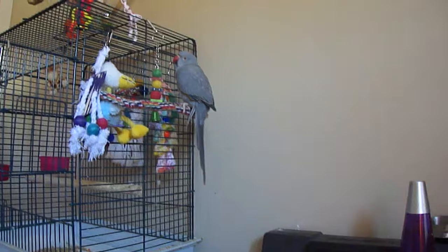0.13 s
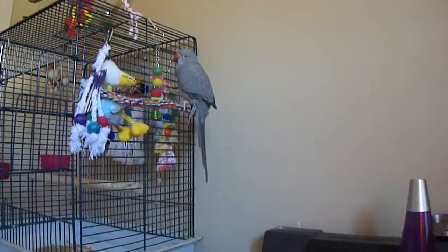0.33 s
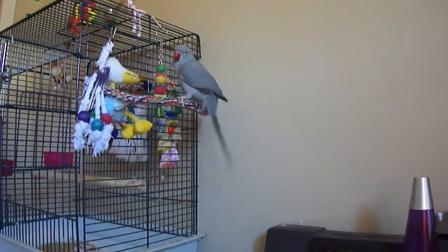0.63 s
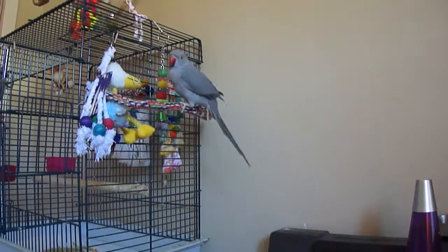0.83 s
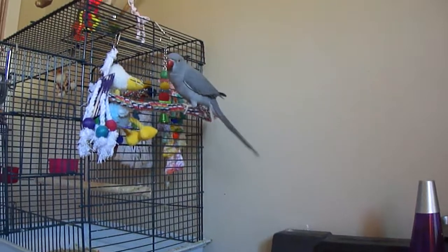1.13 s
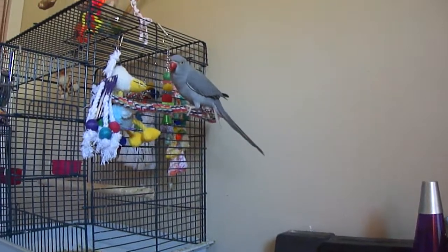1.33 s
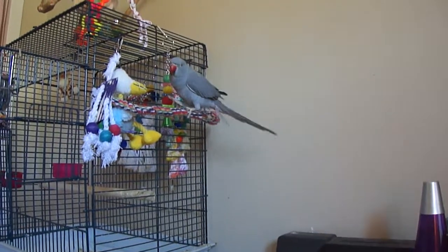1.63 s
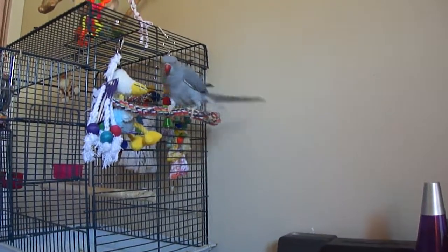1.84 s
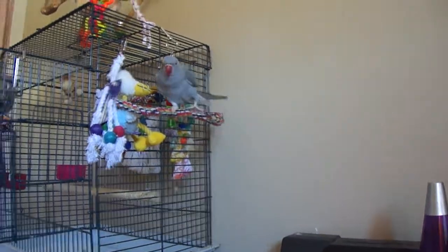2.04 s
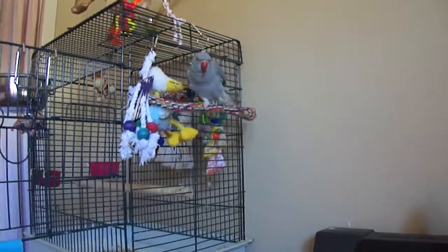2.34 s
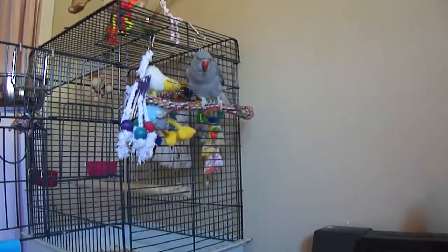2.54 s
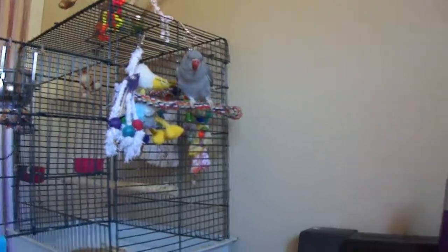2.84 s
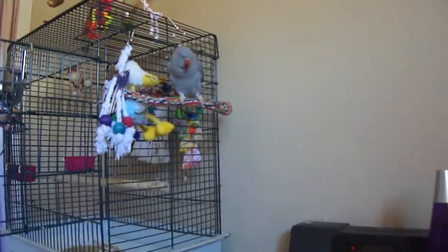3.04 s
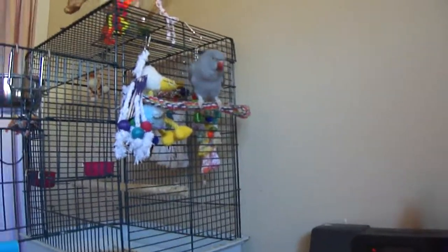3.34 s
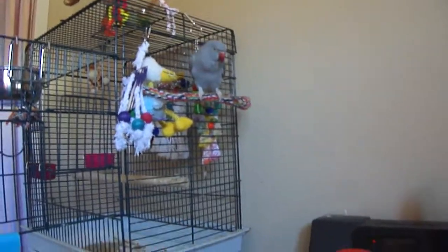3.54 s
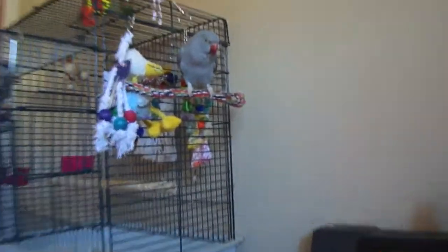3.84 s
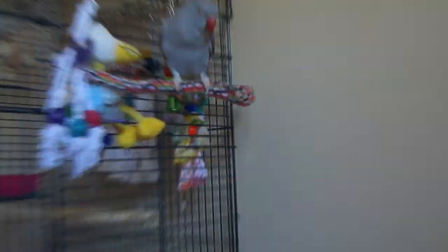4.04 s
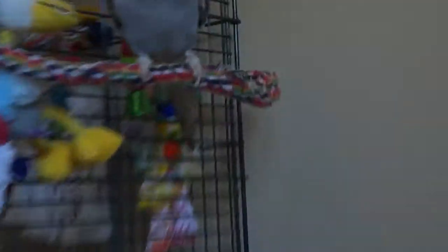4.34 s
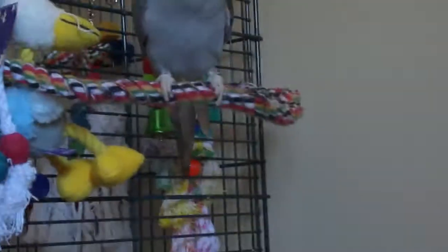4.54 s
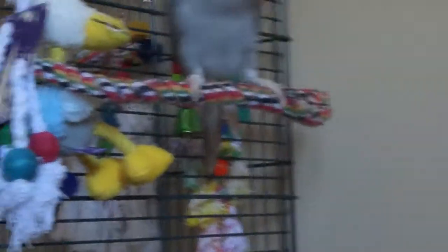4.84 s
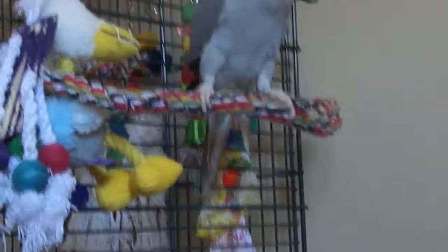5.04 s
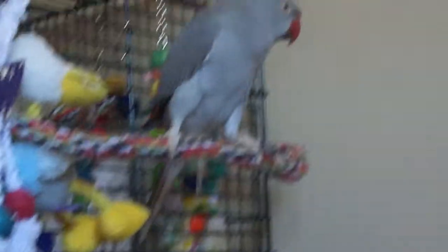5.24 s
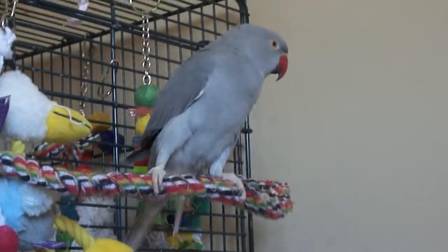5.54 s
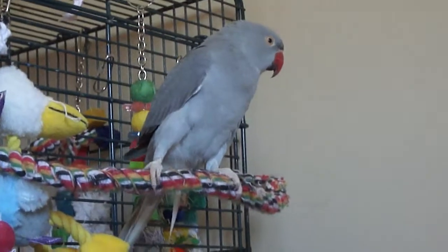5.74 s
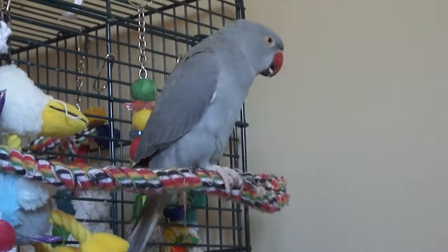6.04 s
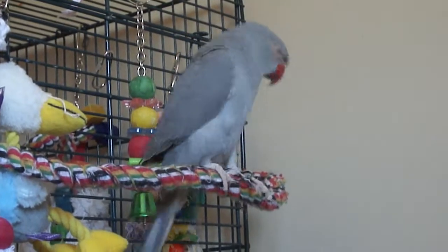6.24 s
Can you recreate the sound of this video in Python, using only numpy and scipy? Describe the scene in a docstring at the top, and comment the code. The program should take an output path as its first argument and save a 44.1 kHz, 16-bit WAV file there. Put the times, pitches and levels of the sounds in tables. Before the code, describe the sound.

Five loud, shrill parakeet squawks come at uneven intervals indoors, with a camera clicking twice and whirring briefly between them.

```python
"""Caged parakeet, close up

A ring-necked parakeet on its cage squawks five times in a bare, quiet room, close to the microphone
of a handheld camera. Membranes in its syrinx make each call: a rising rasp, a piercing whistle, then
a falling cry. The limiter ducks the room under the calls. Cage or beak ticks faintly once. Right by
the microphone the focus drive ticks, the camera clicks twice and the zoom motor whirrs once."""
import sys
import numpy as np
from scipy import signal
from scipy.fft import rfft, irfft, next_fast_len
from scipy.io import wavfile
from scipy.ndimage import uniform_filter1d, map_coordinates

SR = 44100
rng = np.random.default_rng(int(sys.argv[2]) if len(sys.argv) > 2 else 0)


def store_pcm(level_fs):
    """Save levels as 16-bit WAV."""
    pcm = np.round(np.clip(level_fs, -1, 1) * 32767).astype(np.int16)
    wavfile.write(sys.argv[1], SR, np.atleast_2d(pcm).T)


N = 281358
T = np.arange(N) / SR

# Spectrum of the quiet room: frequency_hz, level_db
ROOM_TONE = [(25, -67), (60, -14), (86, -35), (120, -10.5), (160, -19.5), (250, -8.5), (400, -3.5),
             (774, -5.5), (1070, -4), (1350, -8), (2340, -16.5), (5550, -22.5), (7640, -24.5), (10800, -29)]
# Faint steady tones in the room: pitch_hz, level_db
WHINES = [(1040, -61.5), (1100, -58.5), (7860, -70)]
# Spells of focus hunting, silent unless the end follows the start: start_s, end_s
FOCUS_HUNTS = [(.08, 0.37), (.48, 0.6), (1.49, 2.7), (2.3, 1.92), (2.72, 3.04), (4.75, 5.01), (5.555, 6)]
# Resonances of the lens barrel: centre_hz, width_hz, gain_db
BARREL_MODES = [(3930, 1100, -2.5), (6400, 270, 3), (7780, 330, 2)]
# Shuffles of feathers and feet: centre_s, half_length_s, level_db
SHUFFLES = [(.2, .07, -59), (.548, .018, -59), (2.542, 0.078, -59), (2.705, 0.051, -49.5)]
# A faint cage or beak tick, then two camera clicks: start_s, level_db, relative_thud_db
DRY_CLICKS = [(0.624, -31, -7), (3.476, -5, -8), (3.662, -16, -14)]
# The calls, with levels added to each part's usual level: start_s, leap_s, break_s, end_s,
# whistle_top_hz, cry_start_hz, rasp_db, whistle_db, cry_db,
# whistle_tilt_db_per_octave, cry_tilt_db_per_octave
CALLS = [(.894, .918, 1.112, 1.153, 3820, 2260, 4, 3, 5, -8, -4.5),
         (3.0995, 3.128, 3.241, 3.321, 3900, 2470, -1, -.5, 2, -9, -3),
         (4.2455, 4.276, 4.39, 4.463, 3690, 2400, 0, 0, 1, -13, -6.5),
         (5.016, 5.05, 5.146, 5.224, 3620, 2500, -1, -1.5, -2.5, -12.5, -3),
         (5.9165, 5.96, 6.02, 6.117, 3630, 2450, -2, -5, -1, -10.5, -3.5)]
# Throat response during the rasp: frequency_hz, gain_db
RASP_THROAT = [(150, -26), (350, -25), (620, -12), (1400, -8.5), (2300, 0), (3400, -1.5), (4600, -4),
               (6500, -6), (9000, -15.5), (11000, -24)]
# Throat response during whistle, crack and cry: frequency_hz, gain_db
TONE_THROAT = [(200, -33), (600, -40), (1400, -10.5), (1850, -17.5), (2350, -9), (2750, 0), (3250, 1),
               (3800, 3), (4400, 0), (5400, -6), (7000, -7), (9000, -9), (11000, -16)]
# Reflections off the cage tray and the nearby wall: delay_s, gain
REFLECTIONS = [(.0007, -0.036), (.0019, -0.36), (.0031, .2), (.0052, 0.023)]
# Time the bare room takes to die away by 60 dB: frequency_hz, decay_s
ROOM_DECAY = [(300, 0.072), (2000, 0.35), (3600, 0.37), (7000, 0.36), (11000, 0.33)]
# Cracks in the whistle: start_s, length_s, pitch_hz, level_db
CRACKS = [(.951, .018, 4880, -3), (5.988, .03, 4120, -19)]
# Noise spectrum of the zoom motor: frequency_hz, level_db
MOTOR_SPECTRUM = [(35, -78), (60, -28), (115, -17), (241, -5), (796, -2), (1590, -8), (2160, -16),
                  (2740, -11), (3800, -21), (5150, -13.5), (6260, -19), (10800, -32.5), (14000, -75),
                  (22000, -120)]
# Tones of the zoom gears: pitch_hz, relative_level_db
GEAR_TONES = [(2740, -12.5), (3290, -14.5), (4340, -19), (5050, -9), (5800, -23)]
# The camera's duller response while it zooms: frequency_hz, gain_db
ZOOM_DULLING = [(100, -3), (1000, -1.5), (3600, -8), (5500, -17.5), (8000, -23), (11000, -21.5)]


def amp(db):
    """Decibels to gain."""
    return 10 ** (np.asarray(db) / 20)


def unit(x):
    """Scale to rms 1."""
    return x / np.sqrt(np.mean(x ** 2) + 1e-20)


def along(points, hz):
    """Read (Hz, value) points on a log axis."""
    knots_hz, values = np.transpose(points)
    return np.interp(np.log(hz + 1), np.log(knots_hz + 1), values)


def wobble(rate, size=N):
    """A smooth random curve, rate knots a second."""
    knots = rng.standard_normal(int(size * rate / SR) + 4)
    return map_coordinates(knots, [np.arange(size) * rate / SR])


def filtered(x, response):
    """Pass x through a frequency response."""
    size = next_fast_len(len(x) + 8192)
    return irfft(rfft(x, size) * response(np.fft.rfftfreq(size, 1 / SR)), size)[:len(x)]


def noise(spectrum):
    """Coloured noise of rms 1."""
    return unit(filtered(rng.standard_normal(N), lambda hz: amp(along(spectrum, hz))))


def resonate(x, spectrum, size=1024):
    """Causal colouring: the body rings after each pulse."""
    cepstrum = irfft(np.log(amp(along(spectrum, np.fft.rfftfreq(size, 1 / SR)))))
    cepstrum[1:size // 2] *= 2
    cepstrum[size // 2 + 1:] = 0
    return signal.fftconvolve(x, irfft(np.exp(rfft(cepstrum))))[:len(x)]


def gate(t, start, end, rise, fall):
    """1 between start and end, with sloping edges; all in seconds."""
    return np.clip((t - start) / rise, 0, 1) * np.clip((end - t) / fall, 0, 1)


def add(track, start, x):
    """Mix x into the track from start seconds."""
    part = track[round(start * SR):][:len(x)]
    part += x[:len(part)]


def progress(length_s):
    """0 to 1 over a part of a call, one value per sample."""
    return np.linspace(0, 1, max(round(length_s * SR), 64))


def room_tone():
    """The quiet room all round the microphone: low noise, slightly unsteady."""
    return amp(-50 + 1.14 * wobble(19)) * noise(ROOM_TONE)


def whines():
    """Faint tones in the background, barely wavering in pitch."""
    out = np.zeros(N)
    for hz, db in WHINES:
        pitch = hz * (1 + .00319 * wobble(40))
        out += amp(db) * np.sqrt(2) * np.sin(2 * np.pi * np.cumsum(pitch) / SR)
    return out


def focus_drive(steps_per_s=59.94, level_db=-60):
    """Right by the microphone, the focus drive steps once per picture and rings the lens barrel."""
    def barrel(hz):
        return sum((-1) ** k * amp(db) * 1j * hz * width / (centre ** 2 - hz ** 2 + 1j * hz * width)
                   for k, (centre, width, db) in enumerate(BARREL_MODES))

    hunting = sum(gate(T, start, end, .02, .02) for start, end in FOCUS_HUNTS)
    since_step = (T - .0065) % (1 / steps_per_s)
    steps = np.exp(-since_step / .0015) * rng.standard_normal(N)
    return hunting * amp(level_db + 2.6 * wobble(35)) * unit(filtered(steps, barrel))


def feathers():
    """The bird shuffles on its cage: soft swells of fluttering hiss from feathers and feet."""
    swells = sum(amp(db) * np.exp(-((T - centre) / width) ** 2) for centre, width, db in SHUFFLES)
    flutter = amp(1.8 * wobble(150))
    return swells * flutter * noise([(500, -10), (2500, -3.5), (6500, -3), (11000, -20)])


def dry_clicks():
    """A faint cage or beak tick, then two camera clicks: each a sharp snap over a short thud."""
    out, t = np.zeros(N), np.arange(SR // 40) / SR
    for start, db, thud_db in DRY_CLICKS:
        snap = np.sin(2 * np.pi * 6800 * t) * np.exp(-t / .00027)
        grit = .28 * rng.standard_normal(len(t)) * np.exp(-t / .0012)
        thud = np.cos(2 * np.pi * 900 * t) * np.exp(-t / .00054)
        add(out, start, amp(db) * (snap + grit + amp(thud_db) * thud))
    return filtered(out, lambda hz: 1j * hz / (300 + 1j * hz))  # a small part radiates no bass


def syrinx(pitch, tilt_db, throat, jitter, shimmer_db, hiss_db, rise, fall):
    """Membrane pulses, with air noise in step, ring the throat; tilt_db is the slope per octave."""
    n = len(pitch)
    t = np.arange(n) / SR
    rough_pitch = pitch * (1 + jitter * wobble(898, n) + .0061 * wobble(87.4, n))
    phase = 2 * np.pi * np.cumsum(rough_pitch) / SR
    harmonics = np.arange(1, 25)[:, None]
    # the membranes close more or less sharply, so the overtones flare and fade
    flare_db = 3 * np.array([wobble(76, n) for _ in harmonics]) * (harmonics > 1)
    gains = amp(tilt_db * np.log2(harmonics) + flare_db) * (harmonics * pitch < SR / 3)
    pulses = unit(np.sum(gains * np.cos(harmonics * phase), axis=0))
    air = amp(hiss_db) * rng.standard_normal(n) * (1 + np.cos(phase))
    voice = unit(resonate(pulses + air, throat))
    return voice * amp(shimmer_db * wobble(281, n)) * gate(t, 0, t[-1], rise, fall)


def rasp(length_s, low_hz=492, high_hz=2396):
    """Separate pulses speed up into a rough tone that thins out before the leap to the whistle."""
    def beak(hz):
        """The cavities hold each frequency back by a different time, smearing the pulses."""
        delay_s = .0006 * (1 + np.sin(2 * np.pi * hz / 1700 + rng.uniform(0, 2 * np.pi)))
        return np.exp(-2j * np.pi * np.cumsum(delay_s) * hz[1])

    u = progress(length_s)
    t = u * length_s
    pitch = low_hz + (high_hz - low_hz) / (1 + np.exp(-(t - .0148) / .0035))  # an S-curve
    pulses = syrinx(pitch, tilt_db=-2, throat=RASP_THROAT, jitter=.03,
                    shimmer_db=2, hiss_db=-22, rise=.002, fall=.004)
    thump = amp(-31) * t / .0018 * np.exp(1 - t / .0018)  # faint and low, at the start of each call
    envelope_db = -5 * np.exp(-t / .0063) - 8 * u ** 2
    return thump + filtered(pulses, beak) * amp(envelope_db)


def bare_room(x, tail_db=-2.5, build_s=.0076):
    """The bird from close by: direct sound, near reflections, then a dense tail with little bass."""
    hz, t, spectra = signal.stft(rng.standard_normal(SR * 3 // 4), SR, nperseg=256)
    decay = amp(-60 * t / along(ROOM_DECAY, hz)[:, None])
    tail = signal.istft(spectra * decay, SR, nperseg=256)[1]
    thickening = 1 - np.exp(-np.arange(len(tail)) / SR / build_s)
    response = amp(tail_db) * tail / np.linalg.norm(tail) * thickening
    response[0] = 1
    for delay, gain in REFLECTIONS:
        response[round(delay * rng.uniform(.8, 1.2) * SR)] += gain  # the bird moves between calls
    return signal.fftconvolve(x, response)


def whistle(length_s, top_hz, tilt_db, climb_s=.04, sag_hz=903, sag_s=.15):
    """A nearly pure tone climbs to its top; held longer, it gets lower, weaker and harsher."""
    t = progress(length_s) * length_s
    climb_hz = 2100 * length_s  # a longer whistle starts further under its top
    climb_left = np.clip(1 - t / climb_s, 0, 1)
    sag = (np.maximum(t - climb_s, 0) / sag_s) ** 1.3
    waver = wobble(79.6, len(t))  # unsteady pressure shakes pitch and level
    pitch = (top_hz - climb_hz * climb_left ** 2 - sag_hz * sag) * (1 + .0051 * waver)
    tone = syrinx(pitch, tilt_db + 6 * sag, TONE_THROAT, jitter=.0037 + .015 * sag,
                  shimmer_db=.8, hiss_db=-23 + 7 * sag, rise=.004, fall=.003)
    return tone * amp(1.5 * waver - 2.5 * climb_left - 5 * sag)


def whistle_cracks():
    """Twice the whistle cracks and a rough, higher tone joins in."""
    out = np.zeros(N)
    for start, length_s, hz, db in CRACKS:
        pitch = np.full(round(length_s * SR), hz)
        crack = syrinx(pitch, tilt_db=-12, throat=TONE_THROAT, jitter=.045,
                       shimmer_db=2, hiss_db=-19, rise=.002, fall=.008)
        add(out, start, bare_room(amp(db) * crack))
    return out


def cry(length_s, start_hz, tilt_db, end_hz=1476, swell_db=10):
    """The lower register breaks in, swells and brightens as it falls, until the pressure runs out."""
    u = progress(length_s)
    pitch = start_hz + (end_hz - start_hz) * u ** (1 + length_s / .09)  # a longer cry falls later
    breaking = np.exp(-u * length_s / .0047)  # brief roughness at the change of register
    tone = syrinx(pitch, tilt_db + u - .5, TONE_THROAT, jitter=.014 + .047 * breaking,
                  shimmer_db=2, hiss_db=-20 + 12 * breaking, rise=.003, fall=.016)
    return tone * amp(swell_db * (u - 1.5))


def parakeet(overlap_s=.003):
    """Close to the microphone, rasp, whistle and cry run together into each squawk."""
    out = np.zeros(N)
    for (start, leap, drop, end, top_hz, cry_hz,
         rasp_db, whistle_db, cry_db, whistle_tilt, cry_tilt) in CALLS:
        call = np.zeros(SR // 3)
        add(call, 0, amp(rasp_db - 15.5) * rasp(leap + overlap_s - start))
        high_note = whistle(drop + overlap_s - leap, top_hz, whistle_tilt)
        add(call, leap - start, amp(whistle_db - 3.5) * high_note)
        add(call, drop - start, amp(cry_db + 4) * cry(end - drop, cry_hz, cry_tilt))
        add(out, start, bare_room(call))
    return out


ZOOM_START_S, ZOOM_END_S = 3.66, 4.506


def zoom_motor():
    """The motor whirrs unevenly inside the camera, its gear tones wavering with its speed."""
    travel_s = np.cumsum(1 + .009 * wobble(28)) / SR
    gears = sum(amp(db + 1.7 * wobble(28)) * np.sin(2 * np.pi * hz * travel_s) for hz, db in GEAR_TONES)
    labour_db = 3 * np.exp(-((T - 3.93) / .26) ** 2)  # it labours most in mid-travel
    # the camera body carries treble straight to the microphone
    whirr = resonate(noise(MOTOR_SPECTRUM), [(1000, -7), (4000, 1), (8000, 8.5)])
    lumps = amp(1.2 * wobble(30))
    running = gate(T, ZOOM_START_S, ZOOM_END_S, rise=.0018, fall=.12)
    return amp(-35 + labour_db) * running * (lumps * whirr + gears)


def scene():
    """The bird, the room and the camera's own small noises at one microphone."""
    in_room = parakeet() + whistle_cracks() + whines() + feathers() + room_tone()
    in_camera = focus_drive() + zoom_motor()
    return (in_room + in_camera + dry_clicks())[None]


def limiter(x, ceiling_db, release_db_per_s):
    """The gain drops at once on loud sound and climbs back at a steady rate."""
    level_db = 10 * np.log10(np.abs(uniform_filter1d(x ** 2, size=176)) + 1e-12)
    excess_db = np.maximum(level_db - ceiling_db, 0)
    cut_db = np.maximum.accumulate(excess_db + release_db_per_s * T) - release_db_per_s * T
    return x * amp(-uniform_filter1d(cut_db, size=66))


def record(dry, top_hz=11100):
    """The camera limits loud sound, turns duller and quieter while it zooms, and cuts the top treble."""
    x = limiter(dry[0], ceiling_db=-13, release_db_per_s=116)
    zooming = gate(T, 3.62, ZOOM_END_S + .002, rise=.015, fall=.002)
    dulled = filtered(x, lambda hz: amp(along(ZOOM_DULLING, hz)))
    x = x + zooming * (dulled - x)
    x = x * np.clip((T - .09) / .008, 0, 1)  # the sound opens after a moment of silence
    return filtered(x, lambda hz: 1 / (1 + (hz / top_hz) ** 100))[None]


dry = scene()
out = record(dry)
store_pcm(out)
```